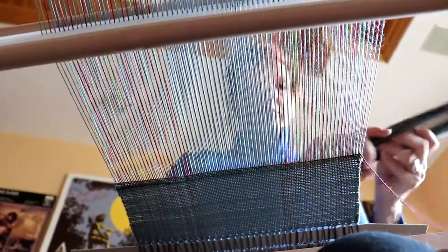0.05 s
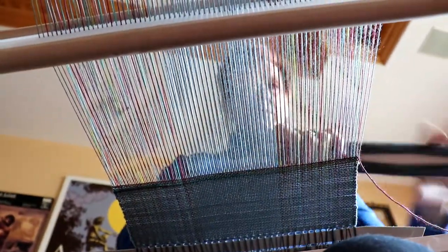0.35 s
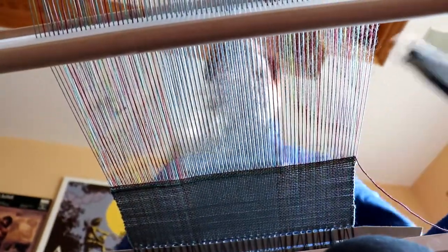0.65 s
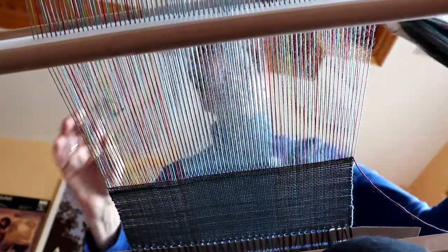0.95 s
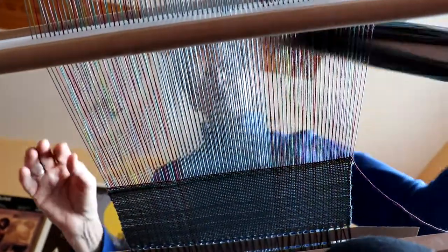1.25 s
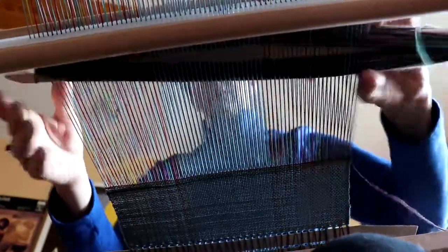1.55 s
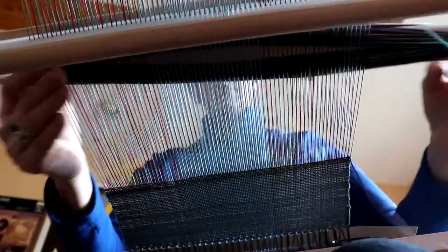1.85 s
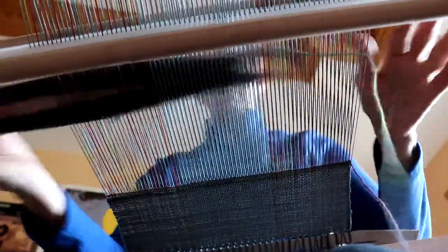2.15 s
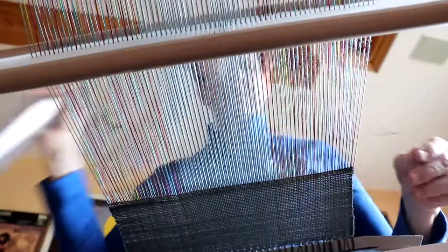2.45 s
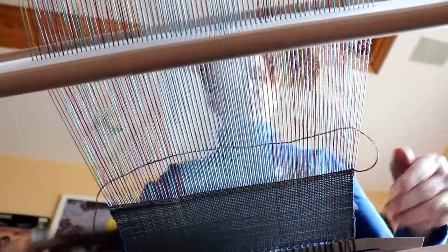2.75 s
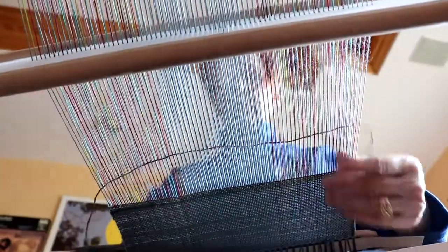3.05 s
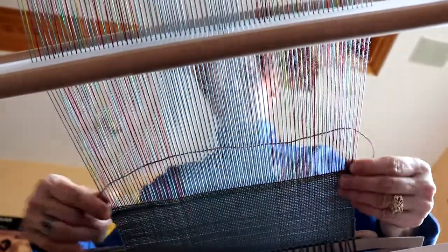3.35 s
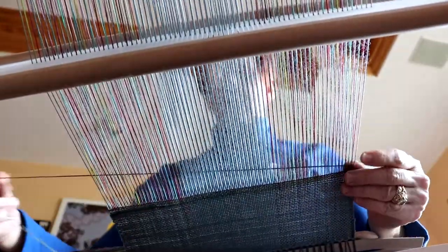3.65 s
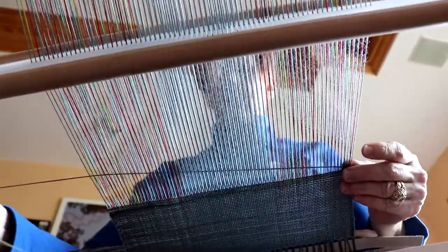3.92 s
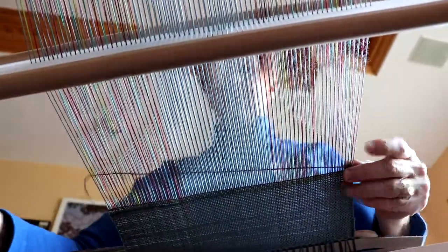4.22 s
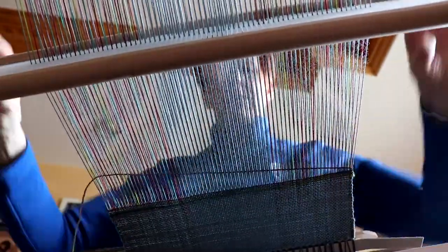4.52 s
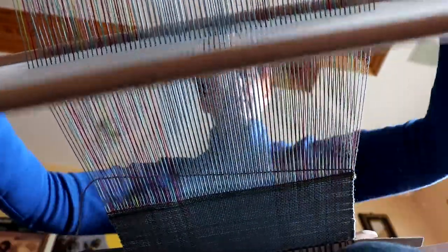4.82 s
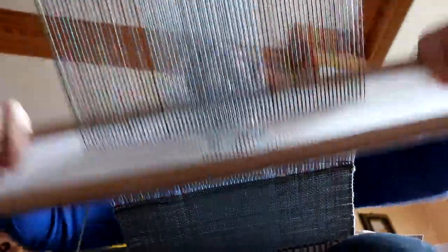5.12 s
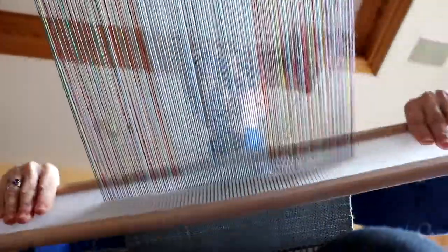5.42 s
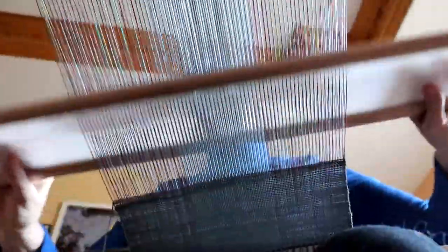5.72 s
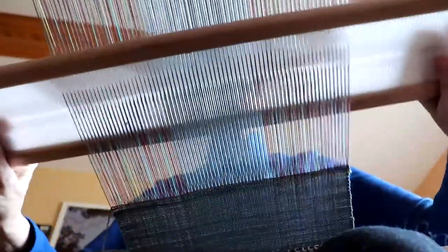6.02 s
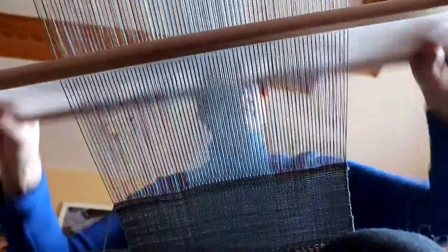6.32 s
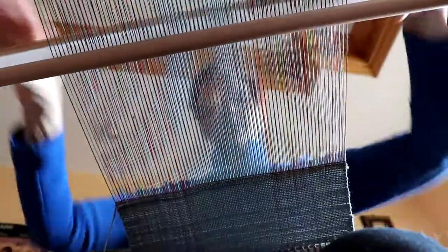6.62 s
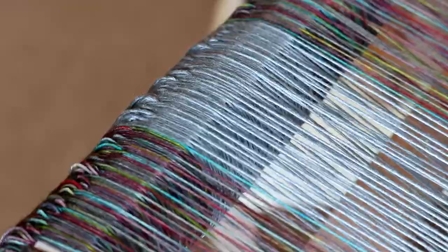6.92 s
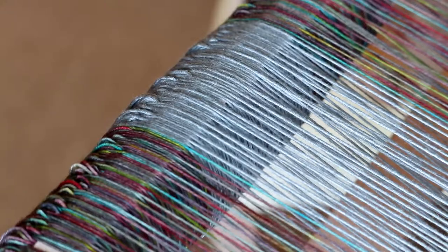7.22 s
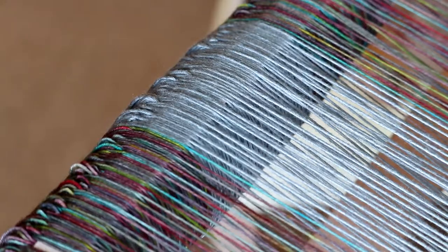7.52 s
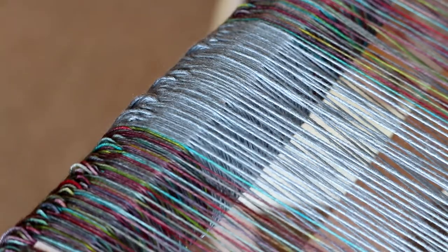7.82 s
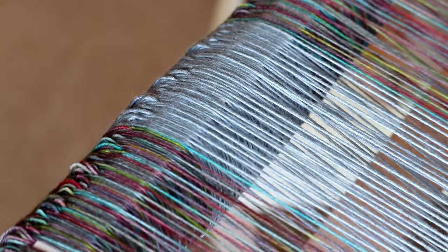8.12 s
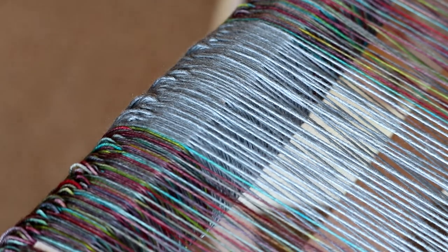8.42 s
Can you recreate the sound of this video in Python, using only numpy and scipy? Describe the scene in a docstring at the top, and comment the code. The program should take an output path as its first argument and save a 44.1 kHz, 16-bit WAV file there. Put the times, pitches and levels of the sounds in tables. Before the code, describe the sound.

Soft scraping and light wooden ticks come first as a shuttle passes through a hand loom and is put down with a dull bump. A lull follows. Then the frame rattles and the heddle swishes along the yarn, ending in a quick run of sharp clacks. Faint cloth rubbing, one loud ratchet snap and a hollow knock come last. The microphone is very close, in a small room with faint steady hiss.

```python
"""A small rigid-heddle loom at work, heard from just under the warp in a quiet room.
A stick shuttle is pushed through and laid down; the heddle is lifted, slid along the warp to beat
the weft, drawn back and clacked into its slot; the ratchet snaps, the frame is knocked, a hand rubs
the cloth. Impacts excite damped modes of the parts, and heddle and frame blows shake the stand.
Sliding friction makes a hiss that grows with speed; brief scuffs, squeaks and ticks sound in between."""
import sys
import numpy as np
from scipy import signal
from scipy.fft import rfft, irfft, next_fast_len
from scipy.io import wavfile
from scipy.ndimage import uniform_filter1d

SR = 44100
rng = np.random.default_rng(int(sys.argv[2]) if len(sys.argv) > 2 else 0)


def wav_out(sig):
    """Save sig, one row per channel (or a flat mono array), as 16-bit PCM at SR to the path in sys.argv[1]."""
    wavfile.write(sys.argv[1], SR, np.round(np.clip(np.atleast_2d(sig).T, -1, 1) * 32767).astype(np.int16))


N = 373086
TIME = np.arange(N) / SR

# Spectrum of the room's still air: frequency_hz, relative_db
AIR_SPECTRUM = [(15, -53), (25, -14), (116, -7), (152, -6.5), (184, -8.5), (205, -7), (291, -8),
                (371, -10.5), (425, -11.5), (812, -16), (1280, -18), (2330, -21), (2810, -21.5),
                (12700, -31), (15800, -38)]
# Faint hum of the room: pitch_hz, level_db
HUM_TONES = [(150, -63.5), (215, -68), (292, -67.5)]
# Difference between the microphone ports, for the air and for all else: frequency_hz, side_minus_mid_db
AIR_SIDE = [(60, -6.5), (200, -5.5), (400, -3.5), (1000, -1), (8000, 0)]
PORT_SIDE = [(100, -30), (300, -27), (600, -10), (1200, -5.5), (2200, -3.5), (8000, -1)]
# Reverberation time: frequency_hz, t60_s
ROOM_T60 = [(125, 0.8), (500, 0.19), (2000, 0.38), (6000, 0.28), (14000, 0.55)]
# Colour of the reverberation: frequency_hz, gain_db
ROOM_COLOUR = [(60, 12), (200, 7.5), (600, 2), (2200, -2.5), (4000, -4.5), (6500, -4.5), (9000, -10),
               (16000, -31)]

# Soft bumps and hollow thuds of the loom's body: start_s, level_db, pitch_hz
BODY_THUDS = [(0.439, -51, 146.4), (1.04, -46, 67), (1.042, -44, 724), (1.64, -49.5, 50.3), (2.06, -55, 53),
              (2.27, -55, 52), (2.36, -50.5, 66), (2.373, -45.5, 424), (2.945, -37.5, 58.5),
              (4.825, -44, 62), (4.83, -36.5, 785), (5.05, -47.5, 76), (5.35, -55, 55), (5.935, -40, 673),
              (7.504, -38.5, 163.7), (7.93, -36, 164.3), (8.282, -44, 163)]
# Response of the stand to a hard blow: pitch_hz, relative_db
HEDDLE_SHAKE = [(56, -38.5), (260, -28.5)]
FRAME_SHAKE = [(125, -33.5), (220, -23)]
# Brief scuffs and a short ring of the ratchet: centre_s, level_db, half_length_s, pitch_hz
SCUFFS_AND_RING = [(1.363, -46, .035, 1310), (1.366, -36, .028, 3970), (1.93, -43.5, 0.0093, 765),
                   (4.724, -42.5, 0.018, 1170), (4.738, -41, 0.051, 8200), (5.974, -32.5, 0.0085, 890),
                   (6.29, -50, 0.011, 506), (8.365, -32, 0.017, 3740), (8.39, -37, 0.034, 2820)]
# Short squeaks and pitched ticks of the shuttle: centre_s, level_db, half_length_s, pitch_hz
SQUEAKS_AND_TICKS = [(1.423, -31.5, 0.0034, 3280), (2.335, -32, 0.0035, 4650), (2.561, -43.5, 0.013, 8300),
                     (3.159, -54, .011, 5400), (4.909, -33.5, 0.01, 6500), (5.048, -39, 0.0098, 6500)]
# Resonances shared by the squeaks and ticks: frequency_hz, width_hz, gain_db
SQUEAK_TICK_MODES = [(3200, 200, 1), (4660, 340, -1.5), (6600, 560, 0), (8470, 590, -5.5)]

# Sliding strokes: start_s, speeding_up_s, slowing_down_s, relative_db, brightness_db. The first table holds the
# shuttle's strokes and ends with a faint pull of the thread by hand, heard with the same friction colour.
SHUTTLE_AND_THREAD_STROKES = [(0.02, 0.12, 0.074, -56.5, 14.5), (0.42, 0.11, 0.039, -53, 17),
                              (1.1, 0.048, 0.28, -49.5, 9.5), (1.25, 0.12, 0.076, -42, 9),
                              (1.41, 0.077, 0.22, -45, 2.5), (1.62, 0.041, 0.089, -54, 17), (1.86, .15, .14, -44, 6.5),
                              (2.12, 0.18, 0.036, -45.5, 6.5), (2.33, 0.036, 0.05, -38.5, 0),
                              (2.88, 0.047, .04, -48.5, 11.5), (2.95, 0.31, .45, -59, 0.5), (3.7, 0.15, .5, -70.5, 13)]
HEDDLE_STROKES = [(4.72, 0.21, 0.12, -42.5, 4), (4.96, 0.13, 0.27, -47.5, 10), (5.13, 0.2, 0.067, -40, 3.5),
                  (5.53, 0.2, 0.089, -42, 5.5), (5.74, 0.12, 0.2, -43, 6.5), (6.03, 0.071, 0.023, -44, -8),
                  (6.13, 0.027, 0.082, -42.5, -12), (6.25, 0.14, .15, -52, 10),
                  (6.35, 0.19, 0.14, -45.5, 6.5)]
HAND_STROKES = [(6.88, 0.14, .25, -54, -6), (7.15, 0.13, 0.37, -56.5, 8.5), (7.42, 0.14, 0.26, -46.5, -0.5),
                (7.95, 0.57, .15, -45.5, -3)]
# Spectra of the friction noise: frequency_hz, relative_db
SHUTTLE_RUB = [(150, -4), (500, -7.5), (950, -0.5), (1300, -1), (1700, -2.5), (2500, -1.5), (3600, -4.5),
               (4800, -5.5), (7000, -9.5), (11000, -14), (16000, -24)]
HEDDLE_RUB = [(150, -10), (500, -7.5), (900, -1.5), (1450, -1), (2150, 1), (3000, -4.5), (3600, -4),
              (5000, -7.5), (7000, -9.5), (9300, -14), (11500, -14.5), (13500, -19), (16000, -24)]
CLOTH_RUB = [(150, -2), (600, -2), (1500, -4), (2800, -1), (3800, -3), (6000, -5.5), (9000, -10),
             (16000, -25)]
# Resonances of the rubbed wood: frequency_hz
RUB_RESONANCES_HZ = [1350, 2560, 3360, 4760, 6700]

# Blows on each part: start_s, level_db, body_db, snap_db, ring_t60_s, left_minus_right_db, room_db
SHUTTLE_TAPS = [(0.6032, -50, -12, 12.5, 0.015, -10, -3), (1.2785, -37.5, -31, -2, 0.012, -7, 10),
                (1.4212, -34.5, -11, 10.5, 0.018, -1, -15), (1.499, -41, -2, 13, 0.02, 0, -5),
                (1.9828, -30, -23, 8, 0.029, 4, -20), (2.004, -32.5, -17, 2, 0.031, -3, 1),
                (2.016, -33.5, -8, 12, 0.021, 16, -18), (2.333, -24.5, -10.5, 10, 0.017, 2.5, -7.5),
                (2.3962, -45, 2, 16, 0.0079, -4, -11), (2.744, -47, 14, -21, 0.014, 2, -7)]
HEDDLE_CLACKS = [(4.8645, -32.5, 2, 13, 0.015, 0, -19), (5.3298, -16, -17.5, -3, 0.03, -9, -5.5),
                 (5.428, -24, -5, -11, 0.047, -1.5, -10.5), (5.8378, -26.5, -30, 2.5, 0.0069, -5, -18),
                 (5.9328, -15.5, -3, -13.5, 0.015, -5.5, -12), (5.963, -19.5, -2, -16, 0.021, 0, -6),
                 (6.0011, -10, -10.5, 0, 0.0091, 1.5, -14), (6.0073, -16.5, -8, -10, 0.028, -4, -16),
                 (6.1256, -7.5, -13, 5.5, 0.013, -4, -12.5)]
FRAME_KNOCKS = [(1.0355, -25.5, -9, -1.5, 0.016, -6, -5), (4.718, -37, 0, -20, 0.058, -1, -16),
                (4.7985, -29, -15, 7, 0.042, 1, 5.5), (4.811, -24.5, -13, -22, 0.013, -13, -2),
                (4.819, -19, -14, -4, 0.027, -6, -10), (4.8224, -18, -0.5, -18, 0.026, -3, -14.5),
                (4.8256, -18.5, -1.5, 8, 0.02, 7, -20), (4.8372, -21.5, -5, -11, 0.016, -6, -26),
                (5.045, -34, 5, 0, 0.042, 3, -12), (7.929, -18.5, -11, -8.5, 0.022, -5, -0.5),
                (8.2265, -42, -8, -12, 0.028, 1, 2), (8.2825, -34.5, 5.5, 5, 0.028, -2, -5.5)]
RATCHET_CLICKS = [(7.5026, -8.5, -9, -7, 0.02, -6, -3.5), (7.6342, -38.5, -10, 14, 0.0074, -5, -7),
                  (7.687, -36, -5.5, 1, 0.02, -4, -3), (8.3322, -39, -8, 18, 0.0063, -9, 7.5),
                  (8.362, -30, -12, 7.5, 0.036, -6, -12), (8.391, -32.5, 1, 5, 0.037, -2, -18)]
# Prominent modes of each part: frequency_hz, relative_db, ring_t60_multiple
SHUTTLE_MODES = [(395, -2, 5), (530, 6, 4), (1286, 1.5, 2.5), (2320, -19, 1.2), (3300, 7, 1.5),
                 (4700, 4, 1.4), (5850, -24, 1), (8300, -7, 1.3)]
HEDDLE_MODES = [(251, -16, 9.2), (529, -1.5, 3.8), (970, -1, 2.8), (1230, -13, 14.4), (1560, -8, 3.5),
                (1850, 3, 2.7), (2146, 1, 2.8), (2570, 6, 1.2), (3010, 6.5, 1.7), (3580, 9.5, 0.8),
                (4850, -13, .8), (6100, 5, 0.53)]
FRAME_MODES = [(218, -23, 10.5), (495, -12, 3), (671, -13.5, 1.7), (874, -2, 1.6), (1195, -18, 4.3),
               (1340, -7, 1.3), (1792, -3.5, 1.24), (2150, -4, 1), (2210, -20, 5.8), (2590, -15, 3.5)]
RATCHET_MODES = [(856, -5.5, 4.6), (1390, -11, 3.2), (1700, 5, 1.1), (1860, -1, 1.5), (2280, -1, 5.1),
                 (2616, -6.5, 6), (2990, -11, 1.4), (3716, 11.5, 1.45), (3720, -11.5, 17)]
# Spectra of the crowd of short-lived modes between them: frequency_hz, relative_db
SHUTTLE_CRACK = [(100, -48), (500, -29), (1200, -7.5), (3000, 6.5), (6000, -3.5), (10000, -12),
                 (16000, -23)]
HEDDLE_CRACK = [(100, -15), (350, -7.5), (700, -6), (1200, -6.5), (2400, -2), (4200, -6.5), (6500, -9),
                (10000, -17.5), (13000, -20.5), (16000, -36)]
FRAME_CRACK = [(100, -26), (350, 1.5), (800, -6), (1300, -3), (2200, -3.5), (3200, -11), (4500, -13),
               (7500, -21), (11000, -29.5), (16000, -37)]
RATCHET_CRACK = [(100, -11.5), (350, -4.5), (900, -8.5), (1900, -0.5), (3000, -7.5), (4500, -16),
                 (7500, -19), (11000, -31.5), (16000, -43)]


def undb(db):
    """Amplitude ratio of a level in decibels."""
    return 10 ** (np.asarray(db) / 20)


def unit(x):
    """Normalisation to rms 1."""
    return x / np.sqrt(np.mean(x ** 2) + 1e-20)


def decay(t, t60):
    """Exponential free decay: 60 dB down after t60."""
    return np.exp(-np.log(1000) * t / t60)


def along(points, hz):
    """Interpolation of (frequency_hz, value) points on a log-frequency axis."""
    frequencies, values = np.transpose(points)
    return np.interp(np.log(hz + 1), np.log(frequencies), values)


def bins(x):
    """Frequency of each bin of x's spectrum."""
    return np.fft.rfftfreq(x.shape[-1], 1 / SR)


def colour(x, points, size=1024):
    """Minimum-phase filter through (frequency_hz, gain_db) points."""
    gain = undb(along(points, np.fft.rfftfreq(size, 1 / SR)))
    cepstrum = irfft(np.log(gain))
    cepstrum[1:size // 2] *= 2
    cepstrum[size // 2 + 1:] = 0
    response = irfft(np.exp(rfft(cepstrum)))
    return signal.oaconvolve(x, response[None], axes=-1)[:, :x.shape[-1]]


def resonate(x, hz, width_hz):
    """Second-order resonance with gain 1 at its centre."""
    return signal.lfilter(*signal.iirpeak(hz, hz / width_hz, fs=SR), x)


def port_noise(count, lag_ms=0):
    """Noise at two close microphone ports: coherence falls with frequency; the left lags by lag_ms."""
    noise = rng.standard_normal((2, count))
    hz = bins(noise)
    mid, side = rfft(noise)
    side = side * undb(along(PORT_SIDE, hz))
    delay = np.exp(-2j * np.pi * hz * lag_ms / 1000)
    return unit(irfft([(mid + side) * delay, mid - side], count))


def wander(samples):
    """Smooth random fluctuation of rms 1 that changes over about this many samples."""
    return unit(uniform_filter1d(uniform_filter1d(rng.standard_normal(N), samples), samples))


def pan(db):
    """Constant-power gains for a left-minus-right level difference."""
    return unit(undb(np.array([[db], [-db]]) / 2))


def add(track, start_s, sound):
    """Superposition of a sound on a track from start_s."""
    start = max(int(start_s * SR), 0)
    part = sound[:, :N - start]
    track[:, start:start + part.shape[1]] += part


def room_air(mid_db, hum_width_hz):
    """Stationary noise, more coherent in the bass, with narrow noise bands heard as a wavering hum."""
    noise = rng.standard_normal((2, next_fast_len(N)))
    hz = bins(noise)
    mid, side = rfft(noise) * undb(along(AIR_SPECTRUM, hz))
    mid, side = irfft([mid, side * undb(along(AIR_SIDE, hz))])[:, :N]
    hiss = np.array([mid + side, mid - side]) / mid.std() * undb(mid_db)
    drive = port_noise(next_fast_len(N))[:, :N]
    hum = 0
    for pitch_hz, level_db in HUM_TONES:
        band = resonate(drive, pitch_hz, hum_width_hz)
        hum += undb(level_db) * unit(resonate(band, pitch_hz, hum_width_hz))
    return hiss + hum


def reverberation(x, first_s, build_s):
    """Dense reflections build up in a small furnished room; each band then decays at its own rate."""
    t = np.arange(SR * 2 // 3) / SR
    noise = port_noise(len(t))
    centres_hz = np.geomspace(60, 16000, 10)
    echo = 0
    for hz, share in zip(centres_hz, np.eye(len(centres_hz))):
        band_gain = along(np.c_[centres_hz, share], bins(noise))
        band = irfft(rfft(noise) * band_gain, len(t))
        echo += band * decay(t, along(ROOM_T60, hz))
    spectrum = rfft(echo * np.clip((t - first_s) / build_s, 0, 1))
    # a diffuse field favours no narrow band
    power = uniform_filter1d(np.mean(abs(spectrum) ** 2, axis=0), size=70)
    echo = irfft(spectrum / np.sqrt(power), len(t))[:, :SR // 2]
    return signal.fftconvolve(x, colour(echo, ROOM_COLOUR), axes=-1)[:, :N]


def stand_shakes(blows, response):
    """Coupling to the stand: each blow sets off thuds, stronger where it has more body."""
    return [(start_s, level_db + body_db / 2 + shake_db, pitch_hz)
            for start_s, level_db, body_db, *_ in blows for pitch_hz, shake_db in response]


def body_thuds(swell_s, spread):
    """The loom rocks on its stand in clusters of damped low modes, the deepest ringing longest."""
    out = np.zeros((2, N))
    t = np.arange(SR // 2) / SR
    swell = (1 - np.exp(-t / swell_s)) ** 2
    shakes = stand_shakes(HEDDLE_CLACKS, HEDDLE_SHAKE) + stand_shakes(FRAME_KNOCKS, FRAME_SHAKE)
    for start_s, level_db, pitch_hz in list(BODY_THUDS) + shakes:
        t60_s = 0.36 * (100 / pitch_hz) ** 0.4
        offsets = np.linspace(-1, 1, 5) + 0.189 * rng.standard_normal(5)
        cluster_hz = pitch_hz * (1 + spread * offsets)
        phases = 2 * np.pi * rng.random((5, 1)) + 0.12 * rng.standard_normal((2, 5, 1))
        cluster = np.sin(2 * np.pi * cluster_hz[:, None] * t + phases).sum(axis=1)
        thud = cluster * decay(t, t60_s) * swell
        add(out, start_s, undb(level_db) * thud / thud[:, :SR // 20].std())
    return out


def resonant_burst(t, half_length_s, hz, width_hz):
    """Random excitation of one resonance: band noise under a Gaussian swell centred on t = 0."""
    band = resonate(port_noise(len(t)), hz, width_hz)
    return unit(resonate(band, hz, 2 * width_hz)) * np.exp(-2 * (t / half_length_s) ** 2)


def scuffs_and_squeaks(room_db):
    """Brief resonances: broad for scuffs and a ratchet ring, narrow for squeaks and shuttle ticks."""
    out = np.zeros((2, N))
    t = np.arange(-SR // 8, SR // 8) / SR
    for centre_s, level_db, half_length_s, pitch_hz in SCUFFS_AND_RING:
        burst = resonant_burst(t, half_length_s, pitch_hz, width_hz=0.4 * pitch_hz)
        add(out, centre_s + t[0], undb(level_db) * burst)
    for centre_s, level_db, half_length_s, pitch_hz in SQUEAKS_AND_TICKS:
        for hz, width_hz, mode_db in SQUEAK_TICK_MODES:
            off_pitch_db = 12 * abs(np.log2(hz / pitch_hz))
            burst = resonant_burst(t, half_length_s, hz, width_hz)
            add(out, centre_s + t[0], undb(level_db + mode_db - off_pitch_db) * burst)
    return np.array([out, out * undb(room_db)])


def stroke_force(strokes, speed_power):
    """Friction noise follows a power of each stroke's arc of speed. Returns force and brightness_db."""
    power, weighted_brightness = np.zeros((2, N))
    for start_s, rise_s, fall_s, level_db, brightness_db in strokes:
        arc = np.interp(TIME, [start_s, start_s + rise_s, start_s + rise_s + fall_s], [0, 1, 0])
        speed = np.sin(np.pi / 2 * arc)
        stroke_power = (undb(level_db) * speed ** speed_power) ** 2
        power += stroke_power
        weighted_brightness += stroke_power * brightness_db
    return np.sqrt(power), weighted_brightness / (power + 1e-20)


def rubbing(strokes, spectrum, speed_power, gain_db, snags_per_s, catches_per_s,
            catch_db, rough_db, flicker_db, pan_db, room_db):
    """Sliding friction: fibres hiss, and single catches come thicker as the stroke quickens."""
    force, brightness_db = stroke_force(strokes, speed_power)
    speed = np.sqrt(force / force.max())
    caught = rng.random(N) < catches_per_s * speed / SR
    catches = caught * undb(2.1 * np.minimum(rng.exponential(size=N), 4))
    slips = port_noise(next_fast_len(N), lag_ms=0.046)[:, :N] * (1 + undb(catch_db) * unit(catches))
    hiss = colour(slips, spectrum)
    hiss /= hiss[:, force > 0].std()
    # as the contact travels along the wood, its resonances come and go
    for hz in RUB_RESONANCES_HZ:
        hiss += resonate(hiss, hz, hz / 5) * (undb(flicker_db * wander(samples=1300)) - 1)
    dull = signal.sosfilt(signal.butter(1, 5000, fs=SR, output="sos"), hiss)
    hiss = dull + (hiss - dull) * undb(brightness_db - 5)
    # the grip tightens and eases from thread to thread
    sound = hiss * force * undb(gain_db + rough_db * wander(samples=300))
    # now and then a thread snags and lets go
    snags = (rng.random(N) < snags_per_s * speed / SR) * rng.random(N)
    sound *= 1 + 1.6 * signal.lfilter([1], [1, -decay(1 / SR, t60=0.015)], snags)
    return np.array([sound * pan(pan_db), sound * undb(room_db)])


def modal_ring(t, modes, ring_s, lag_ms):
    """Free vibration is a sum of damped modes, whose strengths vary with the place of the blow."""
    port_time = np.array([t - lag_ms / 1000, t])
    ring = 0
    for hz, mode_db, t60_multiple in modes:
        strength, detune, shared_phase, side_phase = rng.standard_normal(4)
        phase = 2 * np.pi * hz * (1 + 0.0118 * detune) * port_time + 2 * shared_phase
        # the two ports hear each mode out of step
        phase += undb(along(PORT_SIDE, hz)) * side_phase * np.array([[1], [-1]])
        ring += undb(mode_db + 0.51 * strength) * np.sin(phase) * decay(t, ring_s * t60_multiple)
    return ring


def impacts(blows, modes, crack_spectrum, crack_db, lag_ms, rise_s):
    """Impulsive excitation: hard parts meet and ring over a dense crack, coloured by the contact."""
    direct, to_room = np.zeros((2, 2, N))
    t = np.arange(SR // 5) / SR
    attack = int(0.006 * SR)
    for start_s, level_db, body_db, snap_db, ring_s, pan_db, room_db in blows:
        ring = modal_ring(t, modes, ring_s, lag_ms)
        ring /= ring[:, :attack].std()
        crack = colour(port_noise(len(t), lag_ms) * decay(t, ring_s), crack_spectrum)
        crack = undb(crack_db) * crack / crack[:, :attack].std()
        # close by, a few modes stand out; the room gathers all of them from every side
        hit = np.concatenate([ring + crack, undb(-6) * ring + crack])
        hit *= 1 - np.exp(-t / rise_s)  # bending waves need a moment to fill the wood
        hit = colour(hit, [(450, body_db), (1300, 0), (3200, 0), (7500, snap_db)])
        hit *= undb(level_db) / hit[:, :attack].std(axis=1, keepdims=True)
        near, far = hit.reshape(2, 2, -1)
        add(direct, start_s, near * pan(pan_db))
        add(to_room, start_s, far * undb(room_db))
    # small parts radiate no deep bass
    return signal.sosfilt(signal.butter(4, 85, "high", fs=SR, output="sos"), np.array([direct, to_room]))


def scene():
    """Superposition of the loom's direct sound, its reverberation, its thuds and the room's air."""
    direct, to_room = (
        impacts(SHUTTLE_TAPS, SHUTTLE_MODES, SHUTTLE_CRACK, crack_db=0.5, lag_ms=0.052, rise_s=0.00037)
        + impacts(HEDDLE_CLACKS, HEDDLE_MODES, HEDDLE_CRACK, crack_db=7, lag_ms=0.099, rise_s=0.00031)
        + impacts(FRAME_KNOCKS, FRAME_MODES, FRAME_CRACK, crack_db=1, lag_ms=0.13, rise_s=0.00076)
        + impacts(RATCHET_CLICKS, RATCHET_MODES, RATCHET_CRACK, crack_db=4, lag_ms=0.24, rise_s=0.00069)
        + rubbing(SHUTTLE_AND_THREAD_STROKES, SHUTTLE_RUB, speed_power=1.12, gain_db=-2, snags_per_s=110,
                  catches_per_s=1100, catch_db=-17.5, rough_db=0.5, flicker_db=4,
                  pan_db=-2.5, room_db=-9.5)
        + rubbing(HEDDLE_STROKES, HEDDLE_RUB, speed_power=1.15, gain_db=4, snags_per_s=2,
                  catches_per_s=3600, catch_db=-19, rough_db=0.33, flicker_db=2.65,
                  pan_db=-1.5, room_db=-11)
        + rubbing(HAND_STROKES, CLOTH_RUB, speed_power=0.8, gain_db=-0.5, snags_per_s=23,
                  catches_per_s=270, catch_db=-21, rough_db=1.5, flicker_db=3,
                  pan_db=-7, room_db=-4.5)
        + scuffs_and_squeaks(room_db=-6))
    echo = reverberation(to_room, first_s=0.0017, build_s=0.012)
    thuds = body_thuds(swell_s=0.004, spread=0.332)
    return direct + echo + thuds + room_air(mid_db=-54.2, hum_width_hz=11)


def record(dry):
    """Overload and band limiting: the microphone clips the sharpest clacks; deep bass and top are cut."""
    bass_cut = signal.butter(2, 36, "high", fs=SR, output="sos")
    top_cut = signal.ellip(12, 0.2, 90, 15900, fs=SR, output="sos")
    return signal.sosfilt(top_cut, signal.sosfilt(bass_cut, np.clip(dry, -1, 1)))


dry = scene()
out = record(dry)
wav_out(out)
```